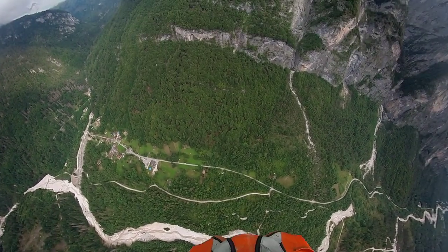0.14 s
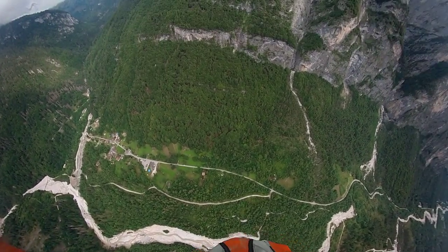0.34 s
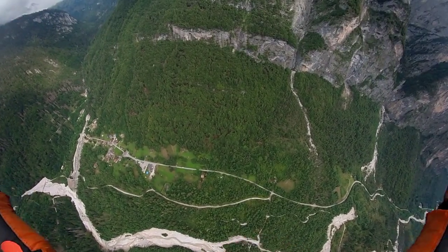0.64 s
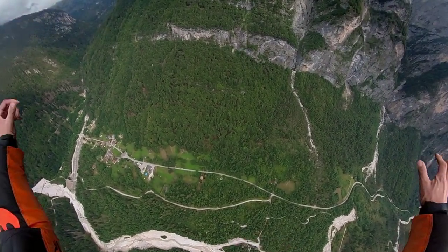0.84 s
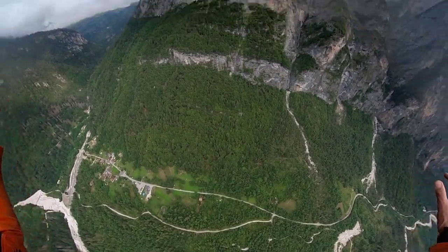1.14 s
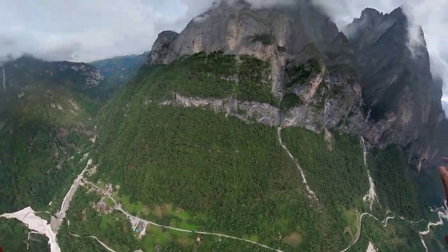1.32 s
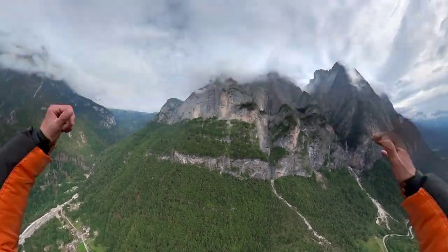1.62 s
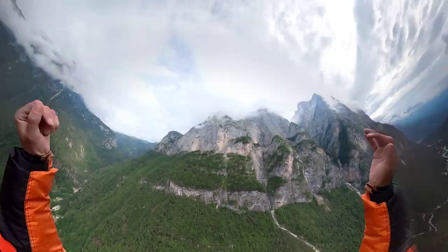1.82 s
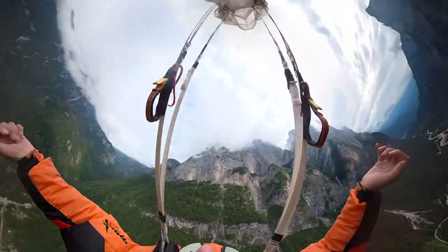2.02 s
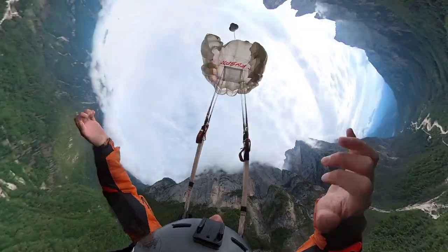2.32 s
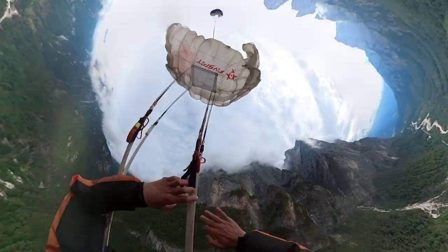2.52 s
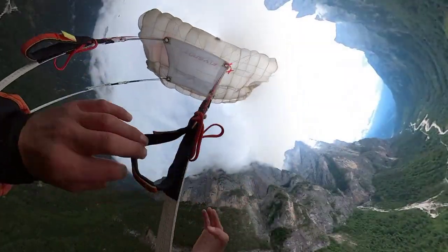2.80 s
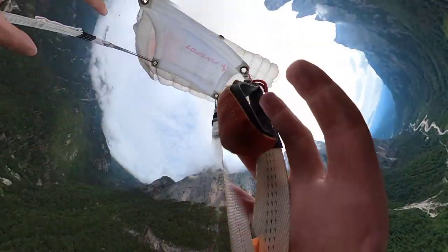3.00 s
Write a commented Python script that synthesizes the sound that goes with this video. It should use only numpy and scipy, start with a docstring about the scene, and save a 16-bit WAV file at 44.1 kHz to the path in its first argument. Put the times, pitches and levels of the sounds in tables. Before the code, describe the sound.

Parachute opening after freefall: roaring wind on the microphone, dull thumps, then fluttering cloth and hard knocks

```python
"""Parachute opening heard at the helmet

Freefall wind roars on the microphone as banded noise, with a shedding throb and a sinking howl as unsteady
tones. Pressure pulses thump as the canopy is pulled out and the wind eases. Harness jolts then knock the
helmet and microphone, as pulses with cracks and a short ring, while the filling cloth flutters in
noise bursts; buffeting returns under the open canopy."""
import sys
import numpy as np
from scipy import signal
from scipy.fft import rfft, irfft, next_fast_len
from scipy.io import wavfile
from scipy.ndimage import uniform_filter1d, map_coordinates

SR = 44100
rng = np.random.default_rng(int(sys.argv[2]) if len(sys.argv) > 2 else 0)


def store_wav(level_fs):
    """Save 16-bit WAV to argv[1]."""
    pcm = np.round(np.clip(np.atleast_2d(level_fs), -1, 1) * 32767)
    wavfile.write(sys.argv[1], SR, pcm.T.astype(np.int16))


N = 138915

# airflow at the microphone: start_s, roar_db, rush_db
WIND_LEVELS = [(0, -26, -26.5), (.12, -24.5, -24.5), (.3, -28, -31), (.52, -25.5, -28.5),
               (.6, -27.5, -29.5), (.79, -22.5, -30.5), (.9, -25.5, -28), (1.25, -23.5, -27),
               (1.45, -21.5, -32), (1.55, -30, -34.5), (1.68, -30.5, -38.5), (1.71, -38.5, -54),
               (1.8, -37.5, -47), (1.93, -26.5, -41), (2.0, -22, -42), (2.11, -40, -49.5), (2.3, -29, -40),
               (2.5, -41, -47), (2.66, -32.5, -52.5), (2.78, -44.5, -56), (2.9, -37.5, -46.5),
               (2.96, -37, -51.5), (3.02, -29.5, -50), (3.15, -36, -51)]
# low eddies on the microphone: start_s, level_db
BUFFET_LEVELS = [(0, -35), (.1, -30), (.2, -48.5), (.42, -30.5), (.55, -37), (.65, -34), (1.1, -25),
                 (1.35, -33.5), (1.55, -38), (1.66, -28.5), (1.84, -35), (2.0, -24.5), (2.1, -28),
                 (2.25, -25.5), (2.4, -27), (2.53, -35.5), (2.62, -25), (2.8, -38.5), (2.94, -37),
                 (3.0, -21.5), (3.15, -21)]
# thin hiss of the air: start_s, level_db
HISS_LEVELS = [(0, -71), (.3, -72.5), (.68, -61), (.85, -64.5), (1.25, -60.5), (1.65, -63.5), (1.73, -72),
               (1.93, -65), (2.05, -80.5), (2.8, -79.5), (2.9, -74), (3.15, -76.5)]
# noise spectra: freq_hz, relative_level_db
BUFFET_SPECTRUM = [(15, -25), (28, -10), (52, -0.5), (100, -3.5), (160, -10.5), (300, -41.5), (800, -94)]
ROAR_SPECTRUM = [(40, -29.5), (90, -4), (140, -2.5), (240, -1.5), (330, -3.5), (420, -11.5), (600, -28),
                 (1500, -86)]
RUSH_SPECTRUM = [(150, -19), (380, -0.5), (560, 3), (830, -4), (1070, -12.5), (1550, -15.5), (2050, -25.5),
                 (2600, -43), (3100, -53.5), (4100, -70.5), (9000, -100)]
HISS_SPECTRUM = [(1200, 2.5), (2500, 15), (3200, 2), (4000, -8.5), (5200, -19), (6300, -2.5), (7100, 2),
                 (8200, -7.5), (9300, -34), (15000, -39.5)]

# eddies shed from the helmet: start_s, pitch_hz, level_db
THROB_TRACK = [(0, 218, -36), (.13, 208, -26.5), (.23, 200.9, -21.5), (.3, 190.9, -33.5), (.6, 230, -47.5),
               (.8, 255, -29), (1.15, 180, -44.5), (1.3, 179.1, -31), (1.44, 178, -24),
               (1.52, 167.4, -46.5), (2.93, 114.2, -61.5), (2.99, 107, -31.5), (3.15, 67, -28)]
# air howling over an edge: start_s, pitch_hz, level_db
HOWL_TRACK = [(0, 686, -32.5), (.13, 640, -33), (.2, 579.7, -37.5), (.28, 570, -34), (.43, 546.5, -27.5),
              (.62, 554.5, -41), (1.45, 567, -45), (1.62, 504, -66.5)]
THROB_DRIFT_HZ, THROB_ROUGH_DB = 95, 3  # drift: random knots per second
HOWL_DRIFT_HZ, HOWL_ROUGH_DB = 125, 3.5
HOWL_WANDER_FRACTION, HOWL_WANDER_HZ = .07, 22  # rms pitch deviation, knots per second
WHISTLE_S, WHISTLE_SIGMA_S, WHISTLE_HZ, WHISTLE_DB = .053, .009, 1840, -35
WHISTLE_DRIFT_HZ, WHISTLE_ROUGH_DB = 380, 4

# rigging ticks: start_s, level_db (before trim and filter)
RIGGING_TICKS = [(1.959, -43), (3.059, -42), (3.069, -40.5)]
# tick filter: freq_hz, gain_db
TICK_RESPONSE = [(500, -16), (2500, 6), (7200, -6.5), (8500, -22), (12000, -47.5)]
TICK_TRIM_DB = 10.0

# canopy dragged out, slow pressure waves: centre_s, peak_db, half_width_s
CANOPY_THUMPS = [(1.639, -17, 0.003), (1.699, -11, 0.0034), (1.717, -13, 0.0046), (1.749, -22.5, 0.013),
                 (1.774, -18, 0.0048)]

# harness jolts knocking the helmet and microphone: centre_s, peak_db, half_width_s, crack_db (before trim)
HARNESS_KNOCKS = [(1.974, -12.5, 0.00061, -27.5), (1.986, -13.5, 0.001, -50.5),
                  (1.9886, -12, 0.00057, -24.5), (1.998, -8.5, 0.0019, -37), (2.026, -13, 0.00088, -33.5),
                  (2.313, -19.5, 0.00078, -28.5), (2.322, -15, 0.00028, -31.5), (2.395, -23, 0.0011, -32.5),
                  (2.417, -15.5, 0.0011, -31), (2.59, -16.5, 0.00066, -40), (2.627, -13.5, 0.0014, -31.5),
                  (2.744, -11.5, 0.00037, -35.5), (3.073, -13.5, 0.0022, -44), (3.0883, -8, .0008, -23),
                  (3.105, -16, 0.00074, -29), (3.1321, -11.5, 0.00087, -42)]
CRACK_TRIM_DB, CRACK_TOP_HZ = 4, 3100
SHELL_HZ, SHELL_T60_S, SHELL_DB = 954, 0.011, -6.5  # ring of the helmet shell, re crack

# cloth flaps: centre_s, slap_db, push_db, crackle_db (before trims)
CLOTH_FLAPS = [(1.631, -21, -31, -36), (1.686, -27, -32.5, -51), (1.935, -29, -11.5, -49.5),
               (1.972, -20, -20.5, -29), (2.019, -25, -16, -45), (2.05, -27.5, -16, -47.5),
               (2.068, -23.5, -22, -40), (2.077, -26, -12.5, -45.5), (2.107, -31.5, -22.5, -51),
               (2.138, -30.5, -15, -46), (2.162, -26.5, -16.5, -38), (2.178, -26, -24.5, -41),
               (2.206, -26, -21, -36), (2.237, -36, -13.5, -42), (2.246, -28, -20.5, -38.5),
               (2.26, -28, -20, -38), (2.27, -26.5, -19.5, -35.5), (2.314, -25.5, -22, -32.5),
               (2.332, -28.5, -20, -38), (2.355, -29.5, -21, -40.5), (2.381, -23, -17, -49),
               (2.393, -23, -16, -38), (2.429, -21.5, -16.5, -46.5), (2.493, -24.5, -23.5, -43),
               (2.541, -34.5, -30, -52), (2.583, -18.5, -29.5, -40.5), (2.631, -20.5, -26.5, -38),
               (2.655, -22, -20, -54), (2.669, -27, -27, -43), (2.71, -22.5, -18, -36.5),
               (2.734, -30, -19, -49.5), (2.751, -23.5, -16.5, -41.5), (2.81, -26, -21.5, -47.5),
               (2.918, -26.5, -35, -55), (2.973, -26.5, -17, -56.5), (3.053, -22.5, -15.5, -48)]
# cloth rustle under the flaps: start_s, level_db
RUSTLE_LEVELS = [(1.93, -49), (2.03, -51), (2.28, -54), (2.46, -59), (2.68, -52), (2.78, -77)]
# slap and crackle spectra: freq_hz, relative_level_db
SLAP_SPECTRUM = [(80, -28), (250, 9), (450, 4), (750, -5), (1100, -21.5), (2000, -48.5), (4000, -75.5)]
CRACKLE_SPECTRUM = [(400, -10.5), (1000, 8.5), (1450, 0), (2100, -8.5), (2800, -17.5), (3600, -27.5),
                    (4900, -42), (7100, -32), (8300, -41), (9500, -63.5), (15000, -73.5)]
PUSH_TRIM_DB, SLAP_TRIM_DB, CRACKLE_TRIM_DB = -1.5, -1, -1.5
PUSH_HALF_WIDTH_S, WIDTH_SCATTER = 0.0014, .08  # scatter: sigma of the log stretch
RISE_S, FALL_S = 0.0032, 0.0057  # to 1/e of the burst peak
CREASE_ROUGH_DB, RUSTLE_ROUGH_DB = 2.2, 5
DULL_FROM_S, DULL_DB_PER_S, SIZZLE_HZ = 2.4, 28, 3760  # cloth treble fades as the fall slows

TOP_HZ, FADE_S = 15800, .003


def amp(db):
    """Decibels to gain."""
    return 10 ** (np.asarray(db) / 20)


def unit(x):
    """Scale to rms 1."""
    return x / np.sqrt(np.mean(x ** 2) + 1e-20)


def clock():
    """Time of each sample, s."""
    return np.arange(N) / SR


def curves(rows):
    """Each column after the time, interpolated to one value per sample."""
    times_s, *columns = np.transpose(rows)
    return [np.interp(clock(), times_s, column) for column in columns]


def wobble(rate_hz):
    """Smooth random curve of rms 1, rate_hz knots per second."""
    knots = rng.standard_normal(4096)
    return unit(map_coordinates(knots, [clock() * rate_hz + 2], mode="wrap"))


def filtered(x, response):
    """Apply a zero-phase gain, a function of frequency in Hz."""
    size = next_fast_len(N + 8192)
    gain = response(np.fft.rfftfreq(size, 1 / SR))
    return irfft(rfft(x, size) * gain, size)[:N]


def coloured(x, points):
    """Filter x by (Hz, dB) points joined on a log-frequency axis."""
    freq_hz, db = np.transpose(points)
    return filtered(x, lambda hz: amp(np.interp(np.log(hz + 1), np.log(freq_hz + 1), db)))


def noise(points):
    """Coloured noise of rms 1."""
    return unit(coloured(rng.standard_normal(N), points))


def steadied(x, size):
    """Divide out slow chance swells; size is the averaging span in samples."""
    power = uniform_filter1d(uniform_filter1d(x ** 2, size), size)
    return x / np.sqrt(np.abs(power) + 1e-6)


def pressure_pulse(centre_s, half_width_s):
    """A suction then a push, of peak 1."""
    u = np.clip((clock() - centre_s) / half_width_s, -10, 10)
    return u * np.exp((1 - u ** 2) / 2)


def wind(eddy_rate_hz=170, roar_rough_db=1.5, rush_rough_db=1.0, gust_rate_hz=30, gust_db=1):
    """Turbulence noise in bands; the same quick eddies roughen roar, rush and hiss."""
    roar_db, rush_db = curves(WIND_LEVELS)
    eddies = wobble(eddy_rate_hz)
    gusts = gust_db * wobble(gust_rate_hz)
    roar_noise = steadied(noise(ROAR_SPECTRUM), size=2000)
    roar = amp(roar_db) * unit(roar_noise * amp(roar_rough_db * eddies + gusts))
    rush = amp(rush_db) * unit(noise(RUSH_SPECTRUM) * amp(rush_rough_db * eddies + gusts))
    buffet = amp(curves(BUFFET_LEVELS)[0]) * steadied(noise(BUFFET_SPECTRUM), size=1600)
    hiss = amp(curves(HISS_LEVELS)[0]) * unit(noise(HISS_SPECTRUM) * amp(eddies))
    return roar + rush + buffet + hiss


def shedding(pitch_hz, level_db, drift_hz, rough_db):
    """Eddies peel off unsteadily: a carrier with random complex drift, a narrow broken tone."""
    drift = wobble(drift_hz) + 1j * wobble(drift_hz)
    phase = 2 * np.pi * np.cumsum(pitch_hz) / SR
    tone = np.real(drift * np.exp(1j * phase))
    return amp(level_db) * unit(steadied(tone, size=1200) * amp(rough_db * wobble(60)))


def edge_tones():
    """Air shed round the helmet: low throb, wandering howl, one brief early whistle."""
    throb = shedding(*curves(THROB_TRACK), THROB_DRIFT_HZ, THROB_ROUGH_DB)
    howl_hz, howl_db = curves(HOWL_TRACK)
    wandering_hz = howl_hz * (1 + HOWL_WANDER_FRACTION * wobble(HOWL_WANDER_HZ))
    howl = shedding(wandering_hz, howl_db, HOWL_DRIFT_HZ, HOWL_ROUGH_DB)
    swell = np.exp(-.5 * ((clock() - WHISTLE_S) / WHISTLE_SIGMA_S) ** 2)
    whistle = shedding(np.full(N, WHISTLE_HZ), WHISTLE_DB, WHISTLE_DRIFT_HZ, WHISTLE_ROUGH_DB)
    return throb + howl + swell * whistle


def rigging():
    """Lines take up load: filtered impulses, tiny dry ticks."""
    ticks = np.zeros(N)
    for start_s, level_db in RIGGING_TICKS:
        ticks[round(start_s * SR)] = amp(level_db + TICK_TRIM_DB)
    return coloured(ticks, TICK_RESPONSE)


def thumps():
    """Slow pressure waves as the canopy leaves its container."""
    return sum(amp(peak_db) * pressure_pulse(centre_s, half_width_s)
               for centre_s, peak_db, half_width_s in CANOPY_THUMPS)


def harness_knocks():
    """Harness jolts knock helmet and microphone: a clean pulse, a dull crack and a short shell ring."""
    waves, cracks = np.zeros((2, N))
    for centre_s, peak_db, half_width_s, crack_db in HARNESS_KNOCKS:
        waves -= amp(peak_db) * pressure_pulse(centre_s, half_width_s)
        cracks[round(centre_s * SR)] = amp(crack_db + CRACK_TRIM_DB)
    # scale the crack filter to an impulse peak of 1
    crack_peak = coloured(signal.unit_impulse(N, "mid"), CRACKLE_SPECTRUM).max()
    crack_sound = coloured(cracks, CRACKLE_SPECTRUM) / crack_peak
    t = clock()[:SR // 10]
    shell = amp(SHELL_DB - 60 * t / SHELL_T60_S) * np.sin(2 * np.pi * SHELL_HZ * t)
    ring = signal.fftconvolve(cracks, shell)[:N]
    return waves + filtered(crack_sound + ring, lambda hz: 1 / (1 + (hz / CRACK_TOP_HZ) ** 20))


def burst(centre_s):
    """Quick swell and slower decay, Gaussian on each side, of peak 1."""
    t = clock() - centre_s
    distance = np.maximum(-t / RISE_S, t / FALL_S)
    return np.exp(-np.minimum(distance ** 2, 20))


def crinkled():
    """Crackling cloth: noise with fast random roughness, steadied to rms near 1."""
    return steadied(noise(CRACKLE_SPECTRUM) * amp(CREASE_ROUGH_DB * wobble(400)), size=250)


def canopy():
    """Each flap pushes air and bursts into slap and crackle noise, over a running rustle."""
    pushes, slap, crackle = np.zeros((3, N))
    stretches = np.exp(WIDTH_SCATTER * rng.standard_normal(len(CLOTH_FLAPS)))
    for (centre_s, slap_db, push_db, crackle_db), stretch in zip(CLOTH_FLAPS, stretches):
        swell = burst(centre_s)
        pulse = pressure_pulse(centre_s, PUSH_HALF_WIDTH_S * stretch)
        pushes -= amp(push_db + PUSH_TRIM_DB) * pulse
        slap += amp(slap_db + SLAP_TRIM_DB) * swell
        crackle += amp(crackle_db + CRACKLE_TRIM_DB) * swell
    rustle = amp(curves(RUSTLE_LEVELS)[0]) * unit(amp(RUSTLE_ROUGH_DB * wobble(93)))
    slap_sound = slap * steadied(noise(SLAP_SPECTRUM), size=200)
    return pushes + slap_sound + (crackle + rustle) * crinkled()


def slowed(x):
    """Fade the cloth's treble at a steady dB rate as the fall slows."""
    sizzle = filtered(x, lambda hz: 1 - 1 / (1 + (hz / SIZZLE_HZ) ** 10))
    sizzle_gain = amp(-DULL_DB_PER_S * np.maximum(clock() - DULL_FROM_S, 0))
    return x - sizzle * (1 - sizzle_gain)


def scene():
    """Sum of all sources in open air: no echo, one channel."""
    return (wind() + edge_tones() + rigging() + thumps() + harness_knocks() + slowed(canopy()))[None]


def record(dry):
    """Fade both ends, then cut everything above the band limit."""
    edge_s = np.minimum(clock(), clock()[::-1])
    fade = np.sin(np.pi / 2 * np.minimum(edge_s / FADE_S, 1)) ** 2
    return filtered(dry[0] * fade, lambda hz: hz < TOP_HZ)[None]


dry = scene()
out = record(dry)
store_wav(out)
```